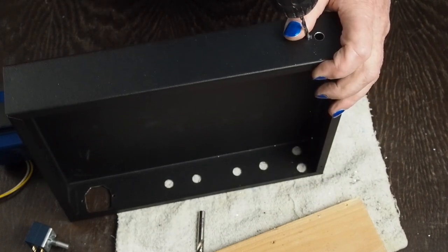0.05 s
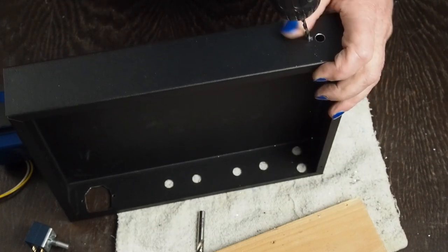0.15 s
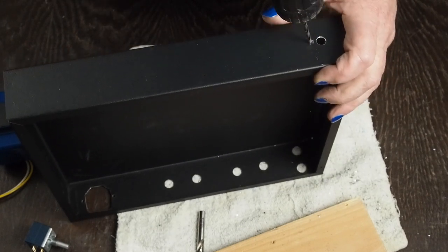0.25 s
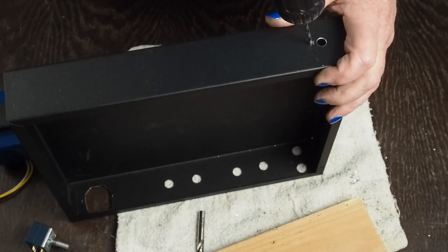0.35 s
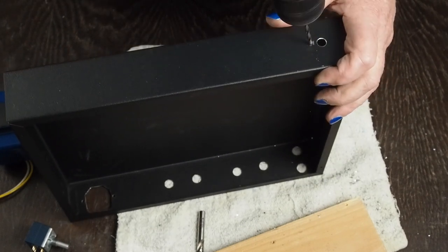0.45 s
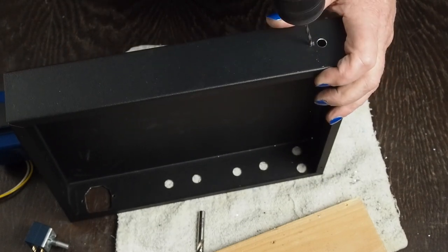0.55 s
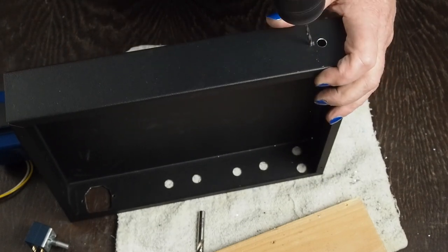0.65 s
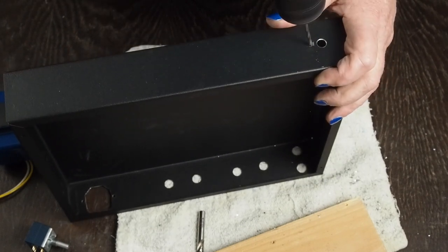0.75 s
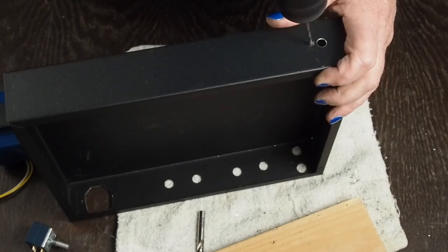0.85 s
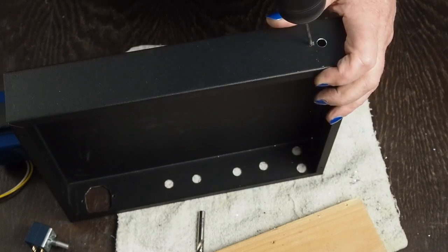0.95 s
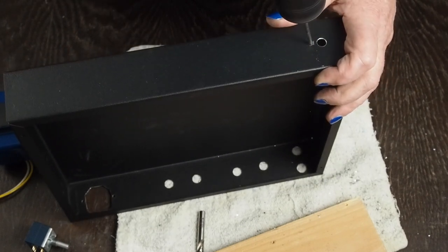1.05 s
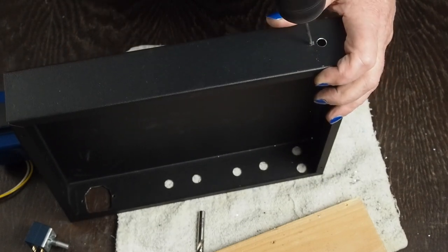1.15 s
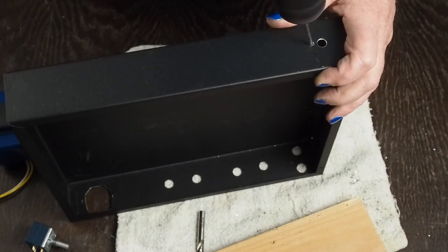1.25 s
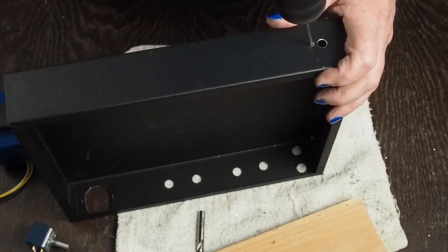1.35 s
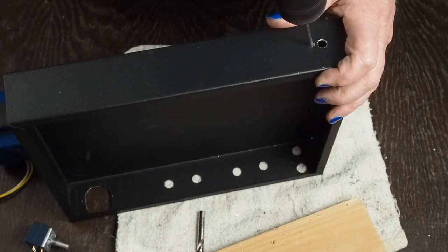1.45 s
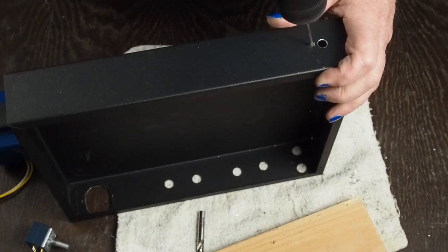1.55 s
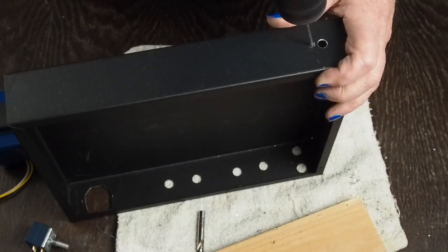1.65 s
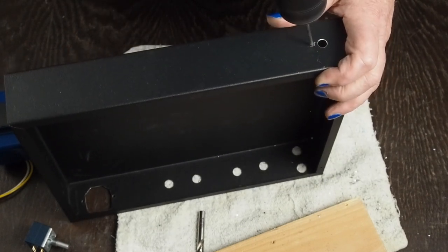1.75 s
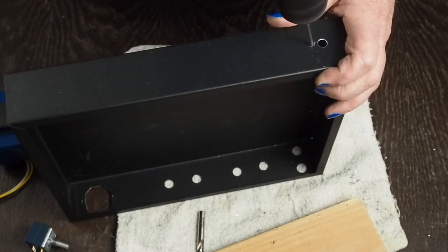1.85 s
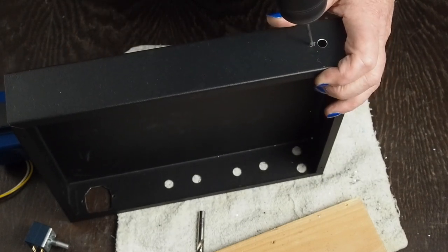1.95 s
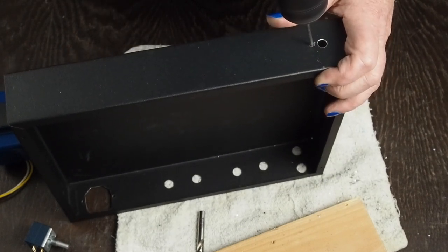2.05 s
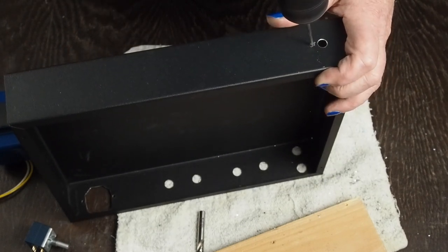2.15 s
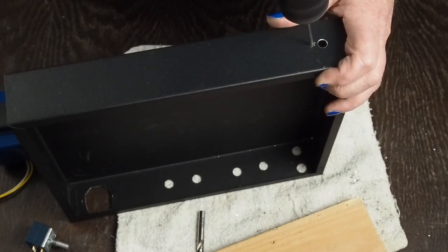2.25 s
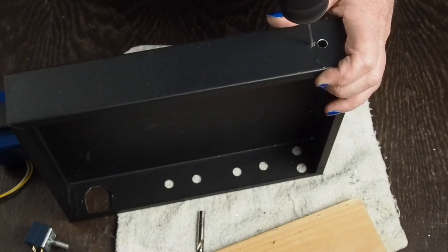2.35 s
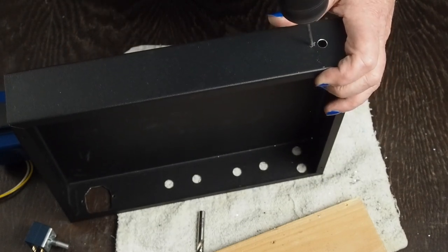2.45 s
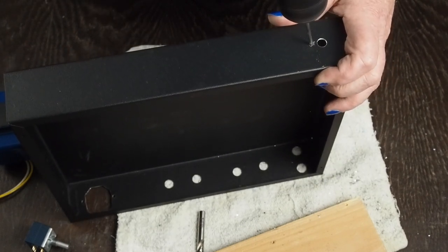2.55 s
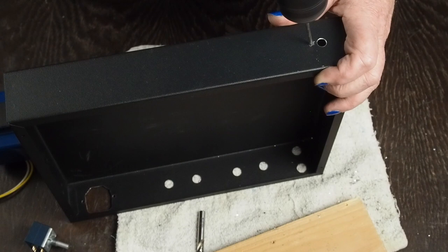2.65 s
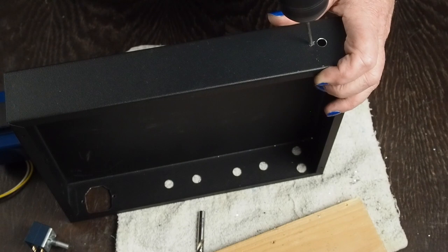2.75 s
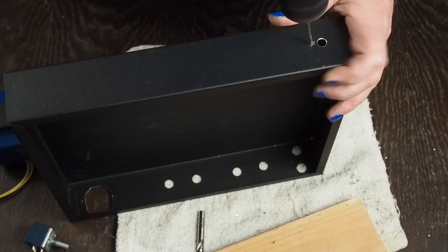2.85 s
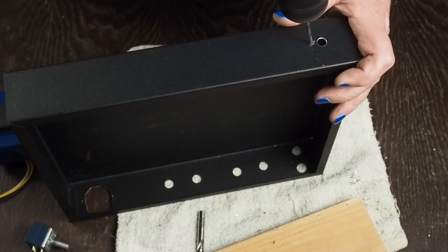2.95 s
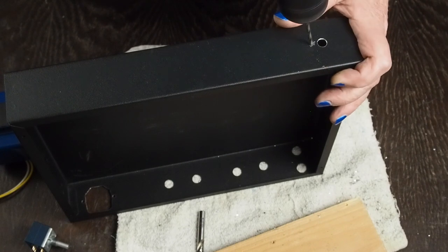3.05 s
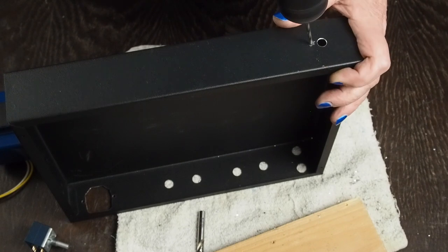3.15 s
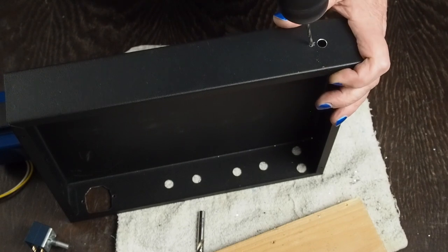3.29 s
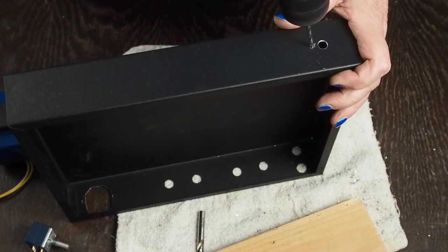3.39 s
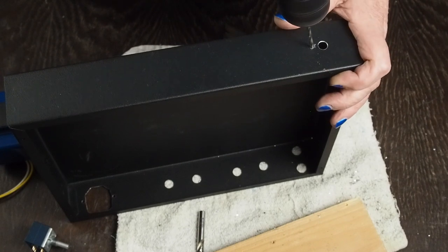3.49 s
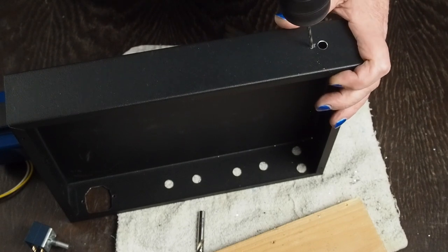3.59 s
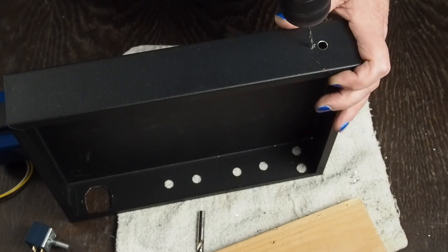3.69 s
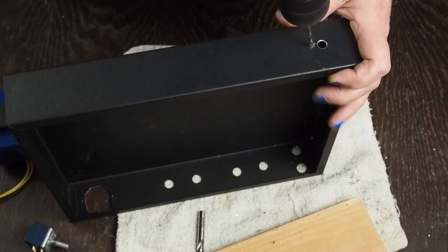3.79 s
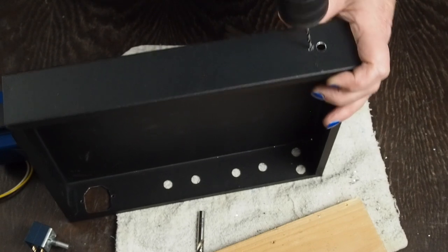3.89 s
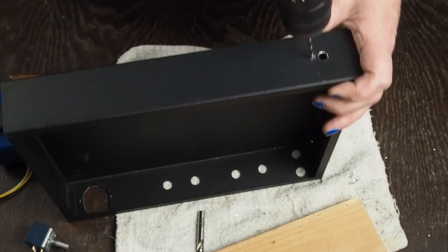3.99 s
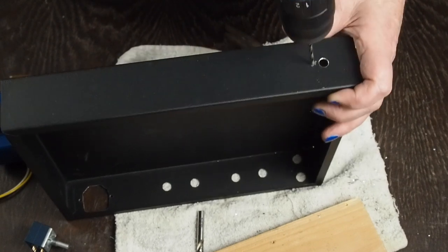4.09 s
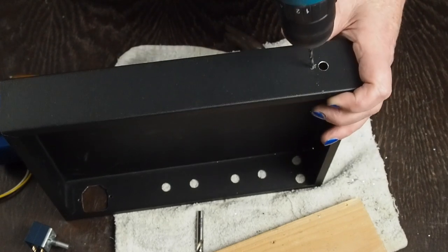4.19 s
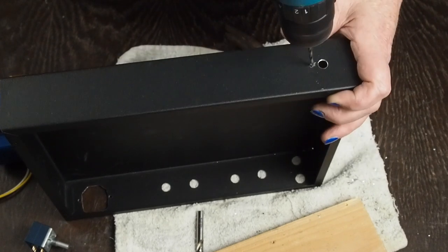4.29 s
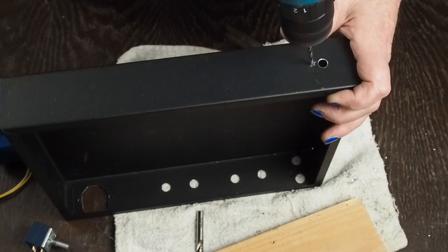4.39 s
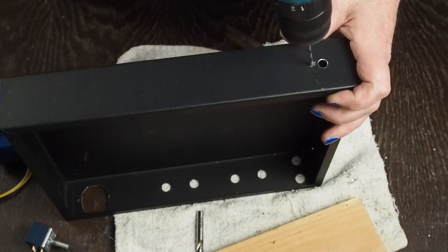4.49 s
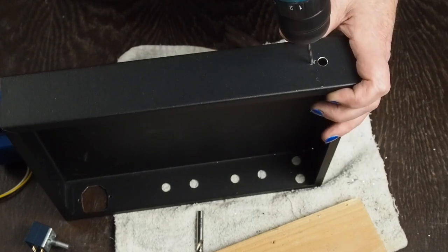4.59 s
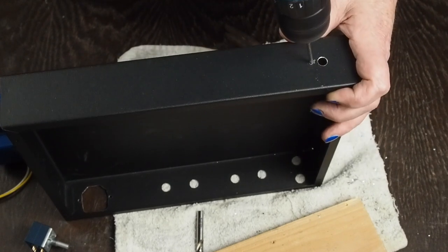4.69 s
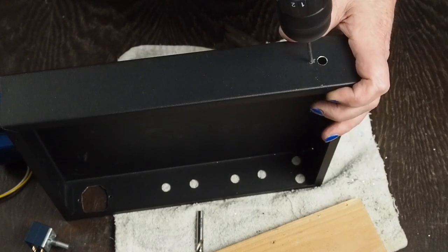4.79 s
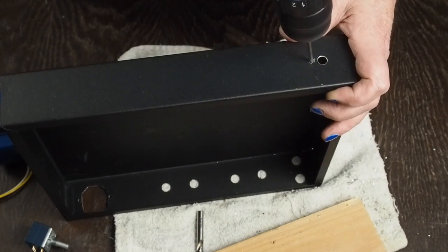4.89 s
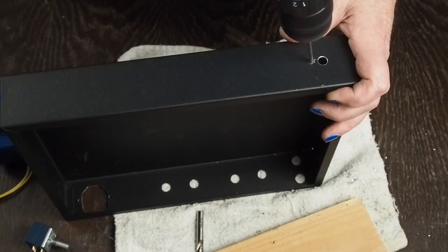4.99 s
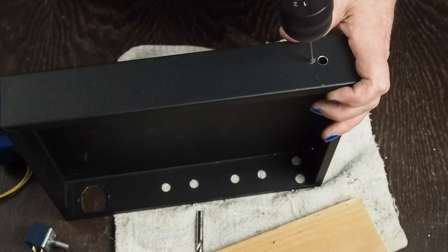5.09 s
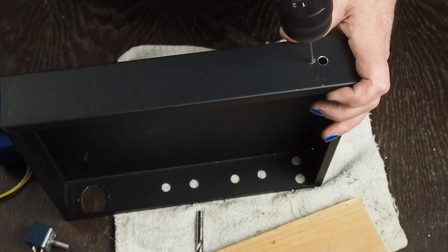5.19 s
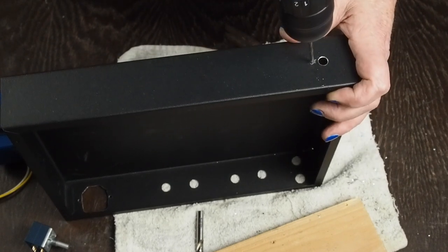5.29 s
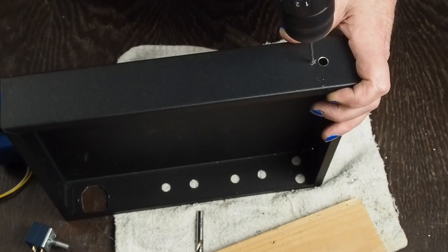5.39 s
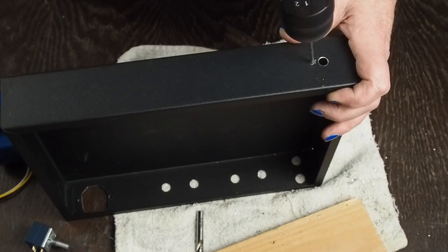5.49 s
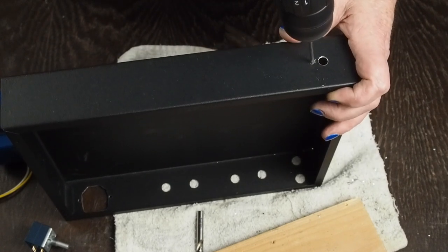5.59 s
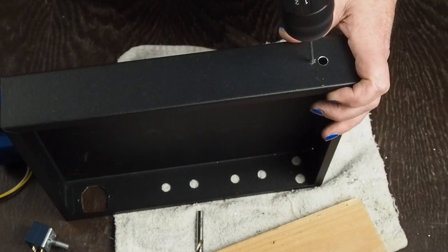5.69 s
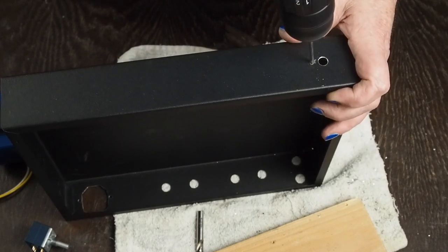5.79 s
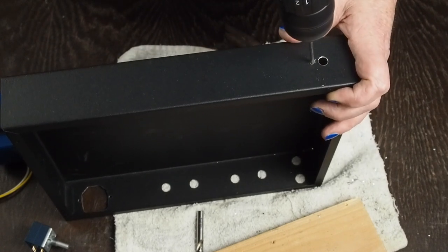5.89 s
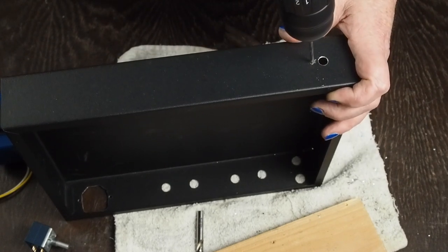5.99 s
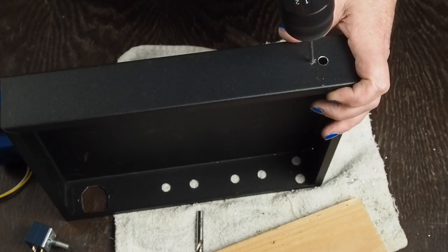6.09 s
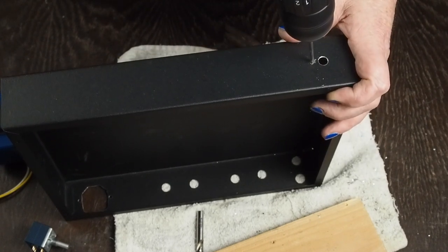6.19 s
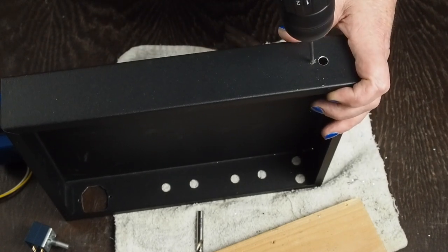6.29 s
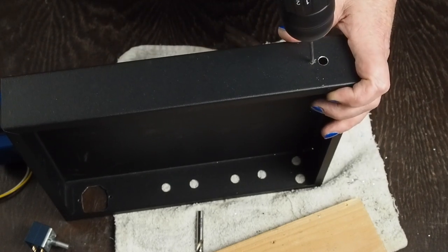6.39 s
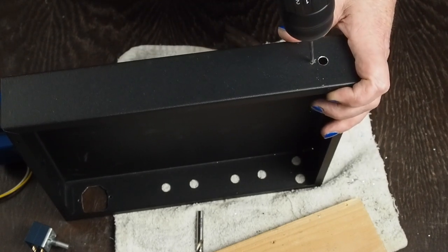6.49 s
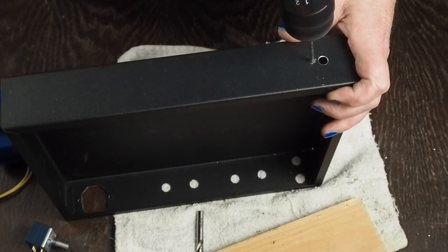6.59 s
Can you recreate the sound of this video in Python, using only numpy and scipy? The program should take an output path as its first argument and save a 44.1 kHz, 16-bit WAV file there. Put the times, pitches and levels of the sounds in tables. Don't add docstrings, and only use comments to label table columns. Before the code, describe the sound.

After faint finger scuffs on metal in a quiet workshop, a drill trigger clicks and the motor buzzes upward in steps to a loud, hissing, gear-whining full speed. Fan air thumps the close microphone early on. It winds down to a low buzzing, rattling crawl, then surges back to full speed, biting into sheet steel with a denser, harsher tone until the end.

```python
import sys
import numpy as np
from scipy import signal
from scipy.fft import rfft, irfft
from scipy.io import wavfile
from scipy.ndimage import uniform_filter1d

SR = 44100
rng = np.random.default_rng(int(sys.argv[2]) if len(sys.argv) > 2 else 0)


def log_audio(samples):
    frames = np.atleast_2d(samples).T
    limited = np.clip(frames, -1, 1)
    pcm = np.round(limited * 32767).astype(np.int16)
    wavfile.write(sys.argv[1], SR, pcm)


def natural_amplitude(level_db):
    exponent = np.asarray(level_db, float) / 20
    return 10 ** exponent


N = 292824
T = np.arange(N) / SR
CHOP_HZ = 143.55
FULL_SPEED = 280


def curve(rows, at=T):
    x, *columns = np.transpose(rows)
    return [np.interp(at, x, column) for column in columns]


def evened(x):
    return x / np.sqrt(np.mean(x ** 2) + 1e-20)


def drift(seconds):
    width = max(round(seconds * SR), 1)
    wander = uniform_filter1d(rng.standard_normal(N), width)
    return evened(uniform_filter1d(wander, width))


def tinted(points):
    f, db = np.transpose(points)
    hz = np.fft.rfftfreq(N, 1 / SR)
    gain = natural_amplitude(np.interp(np.log(hz + 1), np.log(f), db))
    return evened(irfft(rfft(rng.standard_normal(N)) * gain, N))


def ring(x, hz, width):
    return signal.lfilter(*signal.iirpeak(hz, hz / width, SR), x)


def bell(hz, centre, width):
    return 1 / (1 + (2 * (hz - centre) / width) ** 2)


def spells(rows):
    edge_s, gain = .04, 0
    for start, end, db in rows:
        inside = np.minimum(T - start, end - T)
        gain = gain + natural_amplitude(db) * np.clip(inside / edge_s + .5, 0, 1) ** 2
    return gain


# frequency in Hz, density in dB per Hz.
ROOM = [(30, -20), (120, -4), (400, -6), (1200, 0), (3000, -6), (6000, -13), (15600, -18)]


def workshop():
    return natural_amplitude(-66) * tinted(ROOM)


# start in seconds, level in dB, 60 dB decay in seconds, top in Hz.
HANDLING = [
    (.09, -57, .14, 1500),
    (.092, -68, .05, 15000),
    (.225, -65, .08, 15500),
    (.405, -69, .04, 15000),
]


def handling():
    out, t = np.zeros(N), np.arange(6000) / SR
    for s, db, t60, top_hz in HANDLING:
        band = signal.butter(1, [150, top_hz], "band", fs=SR)
        scuff = evened(signal.lfilter(*band, rng.standard_normal(6000)))
        out[round(s * SR):][:6000] += natural_amplitude(db - 60 * t / t60) * np.clip(t / .02, 0, 1) * scuff
    return out


# start in seconds, settled speed in turns per s, settling seconds.
MOVES = [(.47, 91, .06), (.69, 125, .08), (.762, 183, .028), (.99, 200, .06), (1.04, 282, .053),
         (1.45, 278.2, .5), (2.615, 101.5, .03), (3.66, 80, .02), (3.92, 72, .02), (4.45, 112, .17),
         (4.615, 150, .07), (4.692, 278, .044), (4.98, 261, .58)]


def armature():
    start_turns, coast_turns_per_s2 = 20, 322
    speed = np.full(N, float(start_turns))
    for s, goal, settle in MOVES:
        i = round(s * SR)
        t, now = T[i:] - T[i], speed[i]
        settling = goal + (now - goal) * np.exp(-t / settle)
        speed[i:] = np.maximum(settling, now - coast_turns_per_s2 * t)
    return speed


# start in seconds, peak in dB, ring in Hz.
TRIGGER = [
    (0.4722, -39.5, 4460),
    (0.478, -36.5, 2830),
    (0.485, -38, 1470),
    (0.4983, -36, 1500),
]


def trigger():
    out, t = np.zeros(N), np.arange(600) / SR
    for s, db, hz in TRIGGER:
        tick = np.sin(2 * np.pi * hz * t) + 0.38 * np.diff(rng.standard_normal(601))
        out[round(s * SR):][:600] += natural_amplitude(db - 60 * t / 0.011) * tick
    return out


# frequency in Hz, width in Hz, level in dB.
CHOP_RING = [(615, 130, -7), (885, 230, 0), (1250, 400, -26)]
# multiple of its rate, dB re buzz in the first second, dB re buzz later.
CHOP_HUM = [(1, -18, -34), (2, -9, -28), (3, -11, -14), (4, -8, -17)]
# start in seconds, end in seconds, buzz in dB.
CHOPPING = [(.47, .68, -53), (.68, 1.03, -51), (3.2, 3.68, -53), (3.7, 3.93, -54), (3.95, 4.34, -49.5),
            (4.36, 4.59, -51.5), (4.62, 4.73, -49)]
# start in seconds, end in seconds, coil whine in dB at full speed.
WHINING = [
    (1.045, 3.08, -45),
    (4.7, 7, -47),
]


def coils(speed, turns):
    whine_db = 26 * np.log10(speed / FULL_SPEED) - 11 * bell(3 * speed, 545, 60)
    whine_db = whine_db + .005 * np.maximum(np.gradient(speed) * SR, 0)
    pull = np.cos(2 * np.pi * 3 * turns + .25 * drift(.02))
    whine = np.sqrt(2) * spells(WHINING) * natural_amplitude(whine_db + .8 * drift(.03)) * pull

    gate = sum(np.cos(2 * np.pi * k * CHOP_HZ * T) for k in range(1, 9))
    carrier = np.exp(2j * np.pi * 3 * turns + .35j * drift(.015))
    upper = (carrier * signal.hilbert(gate)).real
    buzz = 0
    for k, (hz, width, db) in enumerate(CHOP_RING):
        buzz = buzz + (-1) ** k * natural_amplitude(db) * ring(ring(upper, hz, width), hz, width)
    buzz = evened(buzz)
    buzz = buzz / np.sqrt(uniform_filter1d(buzz ** 2, size=3000) + 1e-9)
    hum = 0
    for k, early_db, late_db in CHOP_HUM:
        hum = hum + natural_amplitude(np.where(T < 1, early_db, late_db)) * np.cos(2 * np.pi * k * CHOP_HZ * T)
    return spells(CHOPPING) * natural_amplitude(2.0 * drift(.02)) * (buzz + hum) + whine


BODY_HZ = [150, 300, 560, 900, 1200, 1750, 2150, 2800, 3550, 4700, 5500, 6500, 7500, 8600, 10100, 12300,
           13800, 15300]
# width in Hz, dB crawling, dB in a light cut, dB loaded.
BODY = [(147, -57, -39, -29), (112, -49, -26, -46.5), (273, -9.5, -8.5, -9.5), (251, 5.5, -27, -5),
        (350, 0, 3.5, 1.5), (304, 0.5, -3.5, -2.5), (442, 1.5, -9, -4), (525, 4.5, 6.5, 4.5),
        (356, -5, -16, -7.5), (670, -0.5, 0, 1.5), (573, -3.5, -2, -4), (980, -2, 0.5, 1.5),
        (714, -5.5, -0.5, -3), (1260, -6.5, -0.5, -0.5), (1100, -6.5, -1, -2), (1500, -6, 2, 2),
        (1310, -4.5, 3, 3), (1200, -9, -1.5, -4)]
# turns per s, hiss in dB, housing band in dB re hiss, panel band in dB re hiss.
RATTLE = [(59.5, -52.5, -0.5, -2), (73.5, -50.5, -2, -6), (102.5, -45, -3.5, -8), (142, -40.5, -5.5, -9),
          (185, -36.5, -8, -11), (276, -30.5, -11, -12)]
# time in seconds, load from 0 to 1.
BITE = [
    (4.8, 0.05),
    (5.2, 0.6),
    (5.8, 1),
]


def body_power(t, hz, speed):
    fast = np.clip((speed - 90) / 150, 0, 1)
    load = np.clip((t - 4.0) / 1.3, 0, 1)
    power = 0
    for f, (width, crawl_db, light_db, loaded_db) in zip(BODY_HZ, BODY):
        db = crawl_db + fast * (light_db + load * (loaded_db - light_db) - crawl_db)
        db = db - 7 * (f == 2150) * (t < .8)
        power = power + natural_amplitude(2 * db) * bell(hz, f, width) ** 1.45
    return power


def hiss(speed, turns, chopped):
    frames, hz = N // 128 + 5, np.fft.rfftfreq(512, 1 / SR)[:, None]
    t = np.arange(frames) * 128 / SR
    slow, bite = np.interp(t, T, speed), curve(BITE, t)[0]
    level_db, housing_db, panel_db = curve(RATTLE, slow)
    level_db = level_db + 2.5 * bite
    housing_db = housing_db + 0.5 * bite
    panel_db = panel_db + 2.5 * bite - 1.0

    def band(lo, hi):
        return (hz >= lo) & (hz < hi)

    power = body_power(t, hz, slow)
    power = power / (power * band(4200, 15600)).sum(0)
    for lo, hi, db in (0, 2760, housing_db), (2550, 3310, panel_db):
        present = (power * band(max(lo, 950), hi)).sum(0)
        power = np.where(band(lo, hi), power / present * natural_amplitude(2 * db), power)

    a, b, patches = rng.standard_normal((frames, 257, 3)).T
    patches = evened(uniform_filter1d(uniform_filter1d(patches, 5, 0), 24, 1))
    z = (a + 1j * b) * np.sqrt(uniform_filter1d(power, size=3, axis=0)) * natural_amplitude(0.87 * patches)
    noise = signal.istft(z, nperseg=512, noverlap=384)[1][:N]
    no_bass = signal.butter(3, 110, "high", fs=SR, output="sos")
    noise = signal.sosfilt(no_bass, noise)
    treble = uniform_filter1d(z.real ** 2, size=40, axis=1)[49:181].sum(0)
    noise = noise / np.sqrt(treble.mean())

    throb = 0.043 * chopped * np.cos(2 * np.pi * CHOP_HZ * T)
    for k, depth in ((.64, .1), (1, .09), (1.283, .12), (3, .06)):
        throb = throb + depth * np.cos(2 * np.pi * (k * turns + rng.random()))
    level_db = np.interp(T, t, level_db) + 1.5 + 0.46 * drift(0.0004) + .5 * drift(0.02)
    return natural_amplitude(level_db) * (1 + throb) * noise


# frequency in Hz, width in Hz, lift in dB.
PANEL = [(1250, 200, 7), (1940, 100, -6), (2130, 220, 9), (2320, 120, -5), (2780, 200, 13.5)]


def panel_lift_db(hz):
    return sum(db * bell(hz, centre, width) for centre, width, db in PANEL)


def shaft_tones(speed, turns, lines, at_s, span):
    part, out = slice(round(span[0] * SR), round(span[1] * SR)), np.zeros(N)
    shaft = np.interp(at_s, T, speed)
    coarse = T[part][::64]
    ratio = speed[part][::64] / shaft
    slack = np.clip(5 * (1 - ratio) - .02, 0, .85)
    for hz, db in lines:
        a, b = uniform_filter1d(rng.standard_normal((2, len(coarse))), size=25) * 5
        lift_db = panel_lift_db(hz * ratio) - panel_lift_db(hz)
        size = natural_amplitude(db + lift_db + 1.5 * (hz > 4000)) * ratio ** (.6 + hz / 3500)
        size = size * np.minimum(ratio, 1) ** ((hz / 3600) ** 3)
        waver = size * (1 - slack + (.16 + hz / 50000 + .7 * slack) * (a + 1j * b))
        tone = np.exp(2j * np.pi * hz / shaft * turns[part])
        out[part] += (tone * np.interp(T[part], coarse, waver)).real
    return 1.7 * out


# frequency in Hz, level in dB.
LIGHT_LINES = [(1114, -57), (1836, -59), (2466, -52), (2794, -56), (3060, -50.5), (3150, -53), (3348, -54),
               (3677, -54.5), (4748, -57), (4915, -57), (6142, -54), (6702, -47.5), (7262, -55),
               (7817, -55), (8096, -54), (8376, -50), (8441, -52), (8656, -53), (8721, -54), (9760, -58),
               (10610, -55), (10890, -56), (11536, -58), (11730, -56), (12285, -51), (12382, -52),
               (12565, -52), (13108, -55), (13679, -54), (13964, -52)]
# frequency in Hz, level in dB.
LOADED_LINES = [(1050, -53), (1728, -53), (2315, -50), (2799, -43), (2864, -48), (2907, -40), (3155, -54),
                (3456, -56), (4732, -55), (5259, -57), (5437, -56), (5609, -49), (5766, -52), (5943, -50),
                (6293, -51), (6837, -55), (7870, -54), (8656, -53), (8748, -51), (8920, -54), (9706, -57),
                (9970, -55), (10503, -59), (11553, -53), (12123, -55), (12355, -55), (12958, -55),
                (13254, -54), (13711, -53), (15122, -57)]


def gears(speed, turns):
    light = shaft_tones(speed, turns, LIGHT_LINES, 2.0, (.5, 3.2))
    loaded = shaft_tones(speed, turns, LOADED_LINES, 6.3, (4.4, 7))
    bite = np.interp(T, [4.6, 4.7, 5.0, 5.6, 6.0, 6.4], [0, .55, .55, .95, .95, 1.02])
    return light + bite * loaded


# peak in seconds, thump in dB, flutter in dB, seconds to swell 10 dB,
# seconds to sink 10 dB.
GUSTS = [(.85, -45, -46, .06, .2), (.955, -34, -36.5, .11, .08), (1.02, -39, -35, .05, .08),
         (1.12, -34.5, -30, .07, .1), (1.25, -35, -35.5, .16, .3), (1.44, -42, -47, .12, .13),
         (1.688, -60, -57, .08, .05), (1.83, -53, -58, .04, .08), (4.74, -60, -56, .04, .1),
         (5.65, -52, -59, .1, .5), (6.0, -50, -60, .3, .12), (6.2, -42, -46, .06, .1),
         (6.59, -44, -62, .2, .06)]
# frequency in Hz, density in dB per Hz.
THUMP = [(15, -42), (30, -15), (65, 0), (140, 4.5), (220, -7), (350, -23), (2000, -90)]
# frequency in Hz, density in dB per Hz.
FLUTTER = [(60, -47), (200, -6.5), (300, -1.5), (450, -10), (700, -13), (1000, -28.5), (3000, -90)]


def draught(speed):
    breeze_db = -65.5 + 37 * np.log10(speed / FULL_SPEED)
    thump, flutter = natural_amplitude(2 * breeze_db), 0
    for s, thump_db, flutter_db, rise, fall in GUSTS:
        away_db = 10 * ((T - s) / np.where(T < s, rise, fall)) ** 2
        thump = thump + natural_amplitude(2 * (thump_db - away_db))
        flutter = flutter + natural_amplitude(2 * (flutter_db - 2.5 * away_db))
    lumps = natural_amplitude(3.56 * np.clip(drift(0.0036), -3, 1.4) + 1.0 * drift(.012))
    wind = np.sqrt(thump) * tinted(THUMP) + np.sqrt(flutter) * tinted(FLUTTER)
    return natural_amplitude(-4.0) * lumps * wind * (T > .6)


def panel_squeal(turns):
    low = np.cos(2 * np.pi * 15.32 * turns)
    high = .5 * np.cos(2 * np.pi * 33.2 * turns + 1.5 * drift(.004))
    held = np.interp(T, [.79, .86, 1.0, 1.03], [0, 1, 1, 0])
    return natural_amplitude(-43 + 2.5 * drift(.012)) * (low + high) * held


# multiple of shaft speed, level in dB.
WOBBLE = [
    (.637, -61.5),
    (1.001, -66),
    (2, -61.5),
]


def wobble(speed, turns):
    low = sum(natural_amplitude(db) * np.cos(2 * np.pi * k * turns) for k, db in WOBBLE)
    grip = np.interp(T, [1.6, 1.9, 4, 5.5], [0.039, 0.82, 0.38, 0.5])
    return np.sqrt(2) * low * (speed / FULL_SPEED) ** 5 * grip


def scene():
    speed = armature()
    turns = np.cumsum(speed) / SR
    chopped = np.clip((200 - speed) / 60, 0, 1)
    drill = coils(speed, turns) + hiss(speed, turns, chopped) + gears(speed, turns)
    drill = drill + panel_squeal(turns) + wobble(speed, turns)
    drill = drill * np.clip((T - .472) / 0.0067, 0, 1)
    mono = workshop() + handling() + trigger() + drill + draught(speed)
    return np.array([mono, mono])


def top_cut(x):
    return signal.sosfilt(signal.butter(12, 16690, fs=SR, output="sos"), x)


def record(dry):
    low_pass = signal.firwin(401, 15780, window=("kaiser", 9), fs=SR)
    mix = signal.oaconvolve(dry, low_pass[None], "same")
    return top_cut(mix)


dry = scene()
out = record(dry)
log_audio(out)
```